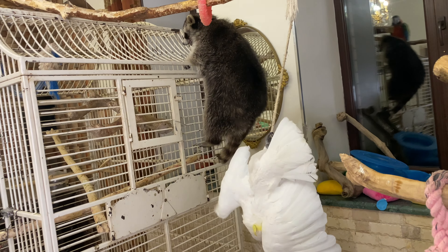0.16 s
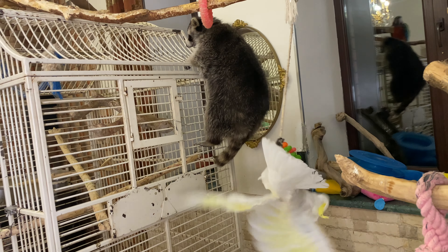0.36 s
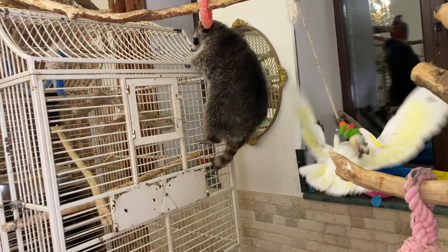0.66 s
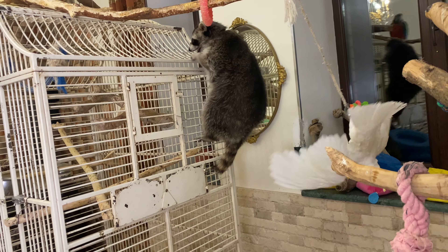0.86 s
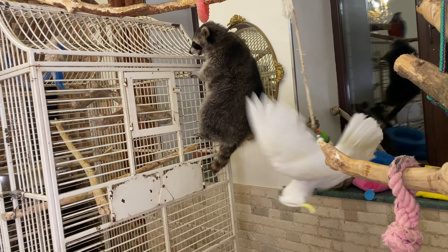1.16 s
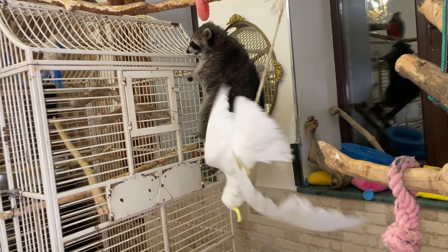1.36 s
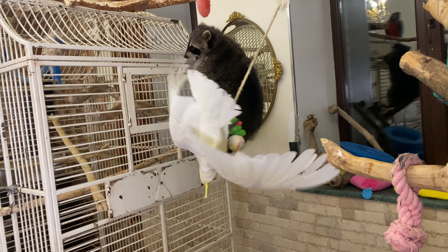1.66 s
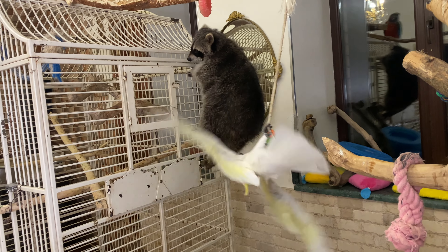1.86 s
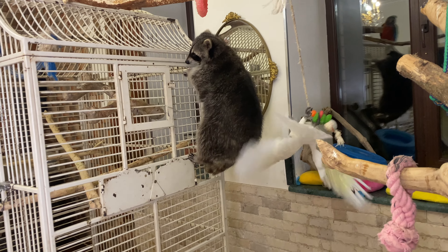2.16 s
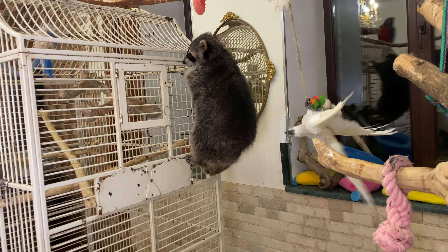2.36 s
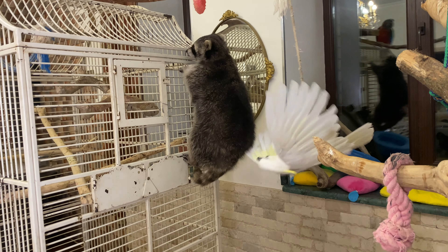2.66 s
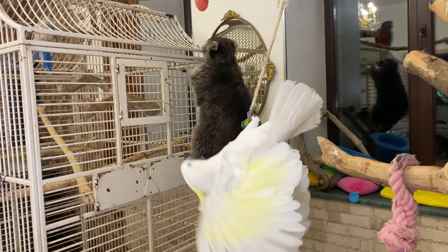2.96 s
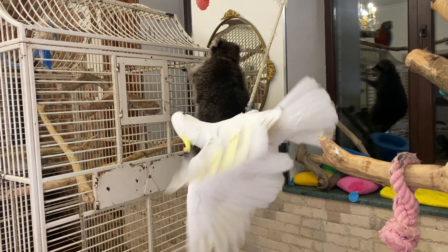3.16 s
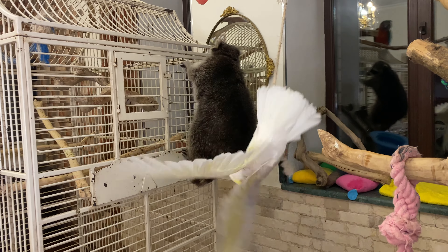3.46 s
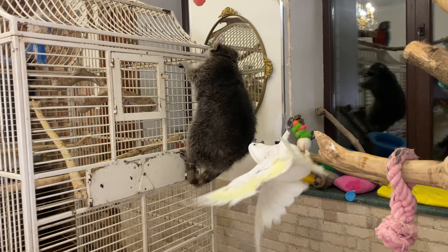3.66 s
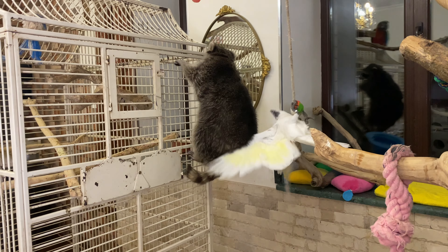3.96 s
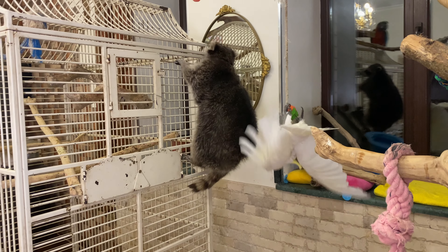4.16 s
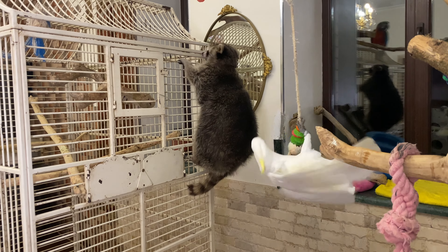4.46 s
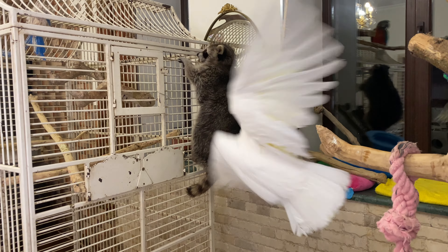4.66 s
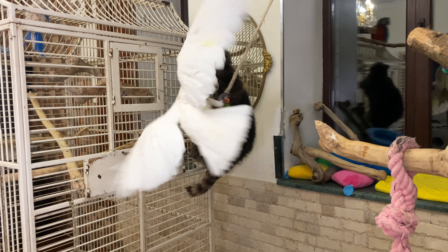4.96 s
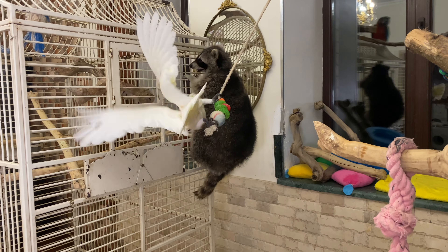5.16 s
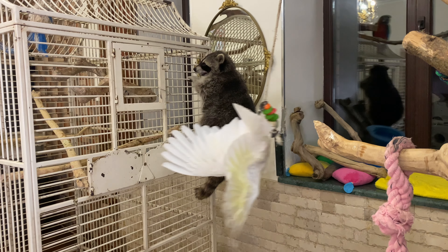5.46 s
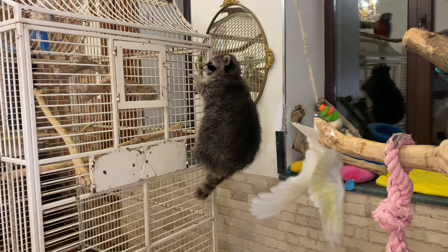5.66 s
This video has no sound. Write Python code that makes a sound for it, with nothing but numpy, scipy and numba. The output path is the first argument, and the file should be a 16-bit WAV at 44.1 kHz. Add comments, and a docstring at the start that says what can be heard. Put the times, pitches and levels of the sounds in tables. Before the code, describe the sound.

A cockatoo on a swinging toy yelps, then lets out a run of harsh rasping screeches in a ringing room, pauses, and screeches once more.

```python
"""A cockatoo on a hanging toy in a hard-walled room, heard in stereo over a faint mains hum.
A dull rumble dies away as a clear yelp comes with a whistle and a croak; then a run of rasping screeches, with
a brief low hum among them. Thin whistles, a croak and a pause with wingbeats lead to a last, wide-open screech.
Each screech scoops up in pitch, some clearer at first, some harsh at once, and grows toward a full rasp as the
syrinx turns more chaotic. The walls ring after each call, differently as the toy swings."""
import sys
import numpy as np
from scipy import signal
from scipy.fft import rfft, irfft, next_fast_len
from scipy.io import wavfile
from scipy.ndimage import uniform_filter1d
from numba import njit

SR = 44100
rng = np.random.default_rng(int(sys.argv[2]) if len(sys.argv) > 2 else 0)


def inscribe(sig):
    """Save sig as 16-bit PCM at rate SR to the path in sys.argv[1].

    A 1-D sig is mono; a 2-D sig holds one channel per row.
    Samples are clipped to [-1, 1] before scaling.
    """
    pcm = np.round(np.clip(np.atleast_2d(sig).T, -1, 1) * 32767)
    wavfile.write(sys.argv[1], SR, pcm.astype(np.int16))


N = 256220
T = np.arange(N) / SR  # s

# Call levels are those at the bird, ahead of the room; tilt_db lowers the bass and lifts the treble by that much.
# screeches: [start_s, length_s, attack_s, level_db, fade_over_call_db, first_pitch_hz, last_pitch_hz,
#  first_roughness_0_to_1, time_to_full_rasp_s, tilt_db, first_beak_hz, last_beak_hz, upper_resonance_hz]
SCREECH_ROWS = [(.754, .18, .024, -12.5, -10, 1140, 1159, .3, .17, 0.5, 2183, 2610, 3195),
                (0.922, 0.15, 0.038, -18.5, 2.5, 1129, 1129, .9, 0.13, 1, 2300, 2160, 3050),
                (1.183, .635, .05, -17, -7, 1062, 1151, 0.68, .3, 0, 2090, 2180, 2870),
                (1.954, .49, .125, -22, -1, 1129, 1080, 0.94, 0.058, -.5, 2230, 2120, 2870),
                (2.529, 0.56, .125, -21, 1, 1167, 1125, 0.45, 0.4385, -0.18, 2450, 2140, 2950),
                (3.279, .395, .055, -22, -4.5, 1120, 1206, 0.63, 0.54, -0.36, 2010, 2310, 2930),
                (5.297, 0.61, .052, -18, -3, 1320, 1382, .8, .5, 1.5, 2475, 2750, 3226)]
# short notes, whistled, clear or harsh: [start_s, length_s, attack_s, level_db, first_pitch_hz, last_pitch_hz,
#  roughness_0_to_1, tilt_db]
WHISTLE_ROWS = [(.415, 0.025, 0.0035, -20.5, 3780, 3625, 0.049, -8.5),
                (.725, 0.046, 0.0025, -26.5, 1638, 2055, 0.24, -13.5),
                (3.849, 0.16, 0.049, -43, 3850, 3925, 0.578, 0),
                (4.092, .128, 0.031, -38, 3825, 4007, 0.16, 0),
                (4.2, .092, 0.029, -34, 4094, 4176, .13, 11)]
YELP_ROWS = [(.421, 0.043, .02, -14.5, 889.8, 879, 0.05, .5),
             (0.457, .085, 0.027, -30.5, 881, 863.7, .05, 0)]
CROAK_ROWS = [(.431, 0.031, 0.0063, -26.5, 3300, 4530, 0.97, 6),
              (4.256, .058, 0.031, -36, 2700, 1400, 1, 2.5),
              (5.287, 0.048, 0.0036, -35, 1432, 1370, 0.72, -3)]
SCREECH_RELEASE_S, NOTE_RELEASE_S = .055, .014
# what a call loses where effort is nil: level, share of its pitch, and treble tilt
SLACK_DB, SLACK_PITCH_SHARE, SLACK_TILT_DB, NOTE_SLACK_TILT_DB = -10, .12, -2.5, -9.5
FULL_RASP = .98  # roughness, 0-1

# broad throat and beak colour of each kind of call: [frequency_hz, gain_db]
YELP_COLOUR = [(400, -19.5), (880, 1.5), (1770, 4), (2650, 8), (3550, -3.5), (4400, -1), (5300, -3),
               (6200, -7), (7100, -18), (8200, -27), (10500, -18), (16000, -33)]
SCREECH_COLOUR = [(250, -34), (450, -23.5), (700, -19.5), (880, -13), (1200, -15), (1650, -6), (2100, -3),
                  (2600, -0.5), (3000, -3.5), (3600, -5.5), (4200, -3), (5450, -10.5), (5750, -12.5),
                  (6100, -9.5), (7000, -15), (8500, -30.5), (11000, -22.5), (13000, -32.5)]
WIDE_OPEN_COLOUR = [(250, -27), (500, -12.5), (900, -6), (1380, -7), (1800, -4), (2600, -1), (3250, -3.5),
                    (4000, -10), (5050, -8), (5450, -17.5), (6400, -10.5), (8200, -29), (11000, -24.5),
                    (13000, -32.5)]
WHISTLE_COLOUR = [(900, -43), (2200, 3), (3000, 5.5), (4000, -0.5), (5000, -7), (6600, -1), (8000, -19),
                  (12000, -24.5)]
CROAK_COLOUR = [(400, -36), (1100, -18), (1700, -2.5), (2600, 3.5), (4000, -2.5), (6500, -4), (8200, -28),
                (11000, -19.5), (14000, -39)]
# windpipe, beak and upper resonance, one row each: [width_hz, level_over_broad_colour_db]
TRACT_RESONANCES = [(190, 2.5), (200, 4), (220, 7)]
WINDPIPE_RATIO = .573  # windpipe resonance as a share of the beak's
BEAK_WOBBLE, BEAK_WOBBLE_HZ = .023, 7.4  # spread of the resonances as a share, low-pass rate

# wingbeats: [centre_s, swish_db, puff_at_microphone_db]
WINGBEAT_ROWS = [(.57, -50.5, -59), (.8, -60, -73.5), (1.18, -47, -80), (1.98, -49.5, -80),
                 (2.42, -51.5, -80), (2.54, -47.5, -83), (4.59, -61, -64), (4.74, -61, -63.5),
                 (4.899, -57, -57), (5.08, -66, -62.5), (5.319, -45, -78)]
SWISH_S, PUFF_S = .023, .025  # spread of each swell
# feather rustles: [centre_s, level_db, spread_s]
RUSTLE_ROWS = [(.335, -51, 0.027), (.39, -47, 0.018), (4.627, -49, 0.0034), (5.173, -44, .0023),
               (5.185, -53.5, 0.0081), (5.22, -63, 0.072)]
# colours of the wing swish, the feather rustle and the puff of air: [frequency_hz, relative_level_db]
SWISH_COLOUR = [(100, -21.5), (250, -14.5), (480, 2.5), (800, -12), (1300, -8), (3000, -14), (12000, -23.5)]
RUSTLE_COLOUR = [(200, 2), (1000, -7), (4500, -3), (6500, -2.5), (8500, -13.5), (11000, -5), (16000, -6.5)]
PUFF_COLOUR = [(25, -18), (55, -7.5), (90, -16), (160, -21), (300, -19), (1000, -53.5)]

# gain of the wall echoes: [frequency_hz, gain_db]
WALL_COLOUR = [(100, -12.5), (600, -2), (820, 1.5), (1100, -1), (2500, .5), (6000, 1.5), (9000, 3),
               (14000, -4.5)]
# time for the echoes to fall 60 dB: [frequency_hz, decay_s]
WALL_DECAY = [(200, 1), (850, 0.71), (1300, 0.68), (3500, 0.69), (9000, 0.53)]
SWING_S = 1.7  # one swing of the toy, there and back
# phase difference between left and right in the direct sound, by frequency: [frequency_hz, phase_rad]
STEREO_PHASE = [(0, -1), (1030, 1.3), (1810, 0.5), (3360, 2), (4390, 0.9), (5680, 0.5), (8100, 9.5),
                (9300, -0.5), (9990, -4.5), (11900, 9.5), (12500, 3), (14400, -13), (15000, 16.5),
                (16500, 2)]

# mains hum, ahead of the background level below: [frequency_hz, level_db]
HUM_TONES = [(50, -72), (100, -71.5), (150, -69.5)]
# colours of the quiet room air and of the opening rumble: [frequency_hz, relative_level_db]
AIR_COLOUR = [(20, -28), (60, -0.5), (150, -6.5), (300, -10.5), (700, -11), (1500, -20.5), (6500, -20),
              (8000, -32), (11000, -15), (15000, -27.5)]
RUMBLE_COLOUR = [(59, -50), (100, -4.5), (155, -13.5), (183, -27), (259, -3), (410, -12.5), (484, -2.5),
                 (870, -14), (989, -4), (1560, -18.5), (2100, -17), (2260, -21.5), (8000, -33.5),
                 (10400, -46), (17600, -120)]
# gain on the hum and room air over time: [time_s, gain_db]
BACKGROUND_LEVEL = [(0, -5), (.8, 6), (.95, -13), (4.3, -12.5), (4.7, -5), (5.3, -7), (5.45, -11),
                    (5.8, -14)]
AIR_DB = -61.5  # ahead of the background level
TOP_HZ = 15500  # where the phone cuts the treble


def cockatoo():
    """All the calls of the bird, ahead of the room."""
    return yelps() + screeches() + whistles() + croaks()


def screeches():
    """Rasping calls from a chaotic syrinx; the one after the pause is made with the throat wide open."""
    first_run = sum(screech(row, SCREECH_COLOUR, wander=.065) for row in SCREECH_ROWS[:-1])
    last = screech(SCREECH_ROWS[-1], WIDE_OPEN_COLOUR, jitter=.07, wander=.08, turbulence=1.2)
    return first_run + last


def yelps():
    """A clear yelp and its softer tail: nearly regular membrane pulses."""
    return sum(note(row, YELP_COLOUR, jitter=.05, wander=.02, turbulence=1.5) for row in YELP_ROWS)


def whistles():
    """Thin whistles: few partials fit above their high pitch."""
    return sum(note(row, WHISTLE_COLOUR, jitter=.06, wander=.035, turbulence=1.4) for row in WHISTLE_ROWS)


def croaks():
    """Short harsh notes from a membrane in rough motion."""
    return sum(note(row, CROAK_COLOUR, turbulence=1.1) for row in CROAK_ROWS)


def screech(row, throat, **voice):
    """A screech scoops up in pitch as effort builds, clearer or harsh at first, grows rougher, then sags."""
    (start, length, attack, db, fade_db, first_hz, last_hz, first_rough, full_rasp_s, tilt_db,
     first_beak, last_beak, upper_hz) = row
    t, progress, effort = effort_curve(start, length, attack, SCREECH_RELEASE_S)
    slack = 1 - effort
    pitch = np.interp(progress, [0, 1], [first_hz, last_hz]) * (1 - SLACK_PITCH_SHARE * slack)
    rough = np.interp(t - start, [0, full_rasp_s], [first_rough, FULL_RASP])
    beak = np.interp(progress, [0, 1], [first_beak, last_beak])
    centres = (WINDPIPE_RATIO * beak, beak, upper_hz)
    level_db = db + fade_db * progress + SLACK_DB * slack
    return call(t, pitch, level_db, rough, tilt_db + SLACK_TILT_DB * slack, throat, centres, **voice)


def note(row, throat, **voice):
    """A short note: one straight glide that swells from nothing and brightens with effort."""
    start, length, attack, db, first_hz, last_hz, rough, tilt_db = row
    t, progress, effort = effort_curve(start, length, attack, NOTE_RELEASE_S)
    pitch = np.interp(progress, [0, 1], [first_hz, last_hz])
    level_db = db + 20 * np.log10(effort + 1e-6)
    return call(t, pitch, level_db, rough, tilt_db + NOTE_SLACK_TILT_DB * (1 - effort), throat, **voice)


def effort_curve(start, length, attack, release):
    """Times of one call, its progress 0-1 and the bird's effort 0-1: attack, hold, release."""
    t = T[(T >= start) & (T <= start + length)]
    effort = np.clip(np.minimum((t - start) / attack, (start + length - t) / release), 0, 1)
    return t, (t - start) / length, effort


def call(t, pitch, db, rough, tilt_db, throat, centres=None, jitter=.0518, wander=.055, turbulence=1.0):
    """One call: a membrane whose period and swing turn chaotic with roughness, heard through the throat."""
    size = len(t)
    rough = np.clip(rough, 0, 1)
    # the period trembles from cycle to cycle and lurches every few dozen cycles
    hz = pitch * np.exp(rough * (jitter * flutter(350, size) + wander * flutter(55, size)))
    phase = 2 * np.pi * np.cumsum(hz) / SR
    # the pulse shape keeps changing, so single partials flare for a few milliseconds
    pulses = np.zeros(size)
    for k in range(1, int(SR / 3 / pitch.mean()) + 1):
        drift = 2 * np.pi * rng.random() + rough * flutter(98.4, size)
        flare = undb(7.5 * rough * flutter(83, size))
        pulses += np.cos(k * phase + drift) * flare
    # air tears through the gap once a cycle
    air = unit(rng.standard_normal(size) * (1 + np.cos(phase)))
    source = unit(pulses) + turbulence * rough * air
    # the swing comes in ragged bursts, bounded by the walls of the syrinx
    bursts = 1 + rough * np.tanh(2 * flutter(220, size))
    shake = undb(rough * 2 * flutter(45, size))
    source = source * bursts * shake
    if centres is not None:
        source = tract(source, t, centres, rough)
    voice = colour(source, throat)
    # more effort lifts the treble against the low partials
    low = colour(voice, [(1000, 8.0), (2600, .5), (5000, -21.5)])
    voice = low * undb(-tilt_db) + (voice - low) * undb(tilt_db)
    # level out over 25 ms, then set the loudness, with 4 ms edges
    voice /= np.sqrt(uniform_filter1d(voice ** 2, size=1100) + 1e-12)
    edges = np.clip(np.minimum(t - t[0], t[-1] - t) / .004, 0, 1)
    out = np.zeros(N)
    out[(T >= t[0]) & (T <= t[-1])] = voice * undb(db) * edges
    return out


def tract(x, t, centres, rough, damping=.24):
    """Windpipe and beak ring on top of the sound, never quite still, and less when the rasp is harshest."""
    ring = np.zeros(len(t))
    for hz, (width, db) in zip(centres, TRACT_RESONANCES):
        moving_hz = hz * np.exp(BEAK_WOBBLE * flutter(BEAK_WOBBLE_HZ, len(t)))
        ring += undb(db) * resonate(x, moving_hz, float(width))
    return x + (1 - damping * rough ** 2) * ring


@njit
def resonate(x, hz, width):
    """State-variable band-pass with a moving centre, gain 1 there."""
    y, band, low = np.empty(len(x)), 0., 0.
    for i in range(len(x)):
        g, k = np.tan(np.pi * hz[i] / SR), width / hz[i]
        v = (band + g * (x[i] - low)) / (1 + g * (g + k))
        band, low, y[i] = 2 * v - band, low + 2 * g * v, k * v
    return y


def wing_swish():
    """Wings swish through the air: a swell of coloured noise at each beat."""
    return swells((s, db, SWISH_S) for s, db, _ in WINGBEAT_ROWS) * noise(SWISH_COLOUR)


def feather_rustle():
    """Feathers brush each other: short swells of coloured noise."""
    return swells(RUSTLE_ROWS) * noise(RUSTLE_COLOUR)


def wing_puffs():
    """Each wingbeat pushes a low puff of air straight onto the microphone."""
    return swells((s, db, PUFF_S) for s, _, db in WINGBEAT_ROWS) * noise(PUFF_COLOUR)


def room(x, direct_db=-6.5, wet_db=-1.5, right_db=1.06):
    """The direct sound differs in phase between left and right; the walls answer from all round."""
    n = next_fast_len(N)
    phase = np.interp(np.arange(n // 2 + 1) * SR / n, *np.transpose(STEREO_PHASE))
    right = irfft(rfft(x, n) * np.exp(-1j * phase), n)[:N]
    direct = np.array([x, right])
    wet = np.array([swinging_echoes(x) for _ in range(2)])
    return (undb(direct_db) * direct + undb(wet_db) * wet) * undb([[0], [right_db]])


def swinging_echoes(x, count=5):
    """The bird swings through several spots, and the walls answer differently from each."""
    place = (count - 1) * (1 + np.cos(2 * np.pi * T / SWING_S)) / 2
    echoes = np.zeros(N)
    for spot in range(count):
        nearness = np.cos(np.pi / 2 * np.clip(place - spot, -1, 1))
        echoes += signal.fftconvolve(x * nearness, wall_echoes())[:N]
    return echoes


def wall_echoes(early=.45, early_s=.02):
    """Response of the room in one channel: a few sharp reflections, then a diffuse tail that dulls as it dies."""
    t = T[:SR]
    f, frame_s, tail = signal.stft(rng.standard_normal(SR), SR)
    decay = undb(-60 * frame_s / at(WALL_DECAY, f)[:, None])
    tail = signal.istft(tail * decay)[1][:SR]
    sparse = rng.random(SR) < 500 / SR  # about 500 reflections a second
    reflections = rng.standard_normal(SR) * sparse * np.exp(-t / early_s)
    response = (unit(tail) + early * unit(reflections)) * np.clip(t / .0026, 0, 1)
    return colour(unit(response) / np.sqrt(SR), WALL_COLOUR)


def low_tone(start=2.922, hz=219, db=-46.0, step_db=-9, ring_db=-23):
    """A brief low hum, a sine that drops to a weaker level, stops and rings on faintly; stronger at right."""
    t = T - start
    steps_s = [0, .014, .06, .073, .13, .14, .4]
    shape = np.interp(t, steps_s, [0, 1, 1, undb(step_db), undb(step_db), undb(ring_db), 0])
    tone = undb(db) * shape * np.sqrt(2) * np.sin(2 * np.pi * hz * t)
    return tone * undb([[-3], [2]])


def background():
    """Rumble, with hum and air under a level that drops quickly as screeches begin and partly recovers in the pause."""
    level = undb(np.interp(T, *np.transpose(BACKGROUND_LEVEL)))
    return (mains_hum() + room_air()) * level + rumble()


def mains_hum():
    """Steady sines at the mains frequency and its harmonics."""
    return sum(undb(db) * np.sqrt(2) * np.sin(2 * np.pi * (hz * T + rng.random())) for hz, db in HUM_TONES)


def room_air():
    """Quiet coloured noise, partly common to left and right and partly each side's own."""
    own = np.array([noise(AIR_COLOUR), noise(AIR_COLOUR)])
    return undb(AIR_DB) * (.9 * noise(AIR_COLOUR) + .5 * own)


def rumble():
    """Dull noise, separate at left and right, that dies away from the start by 60 dB in 0.68 s."""
    return undb(-43.5 - 60 * T / .68) * np.array([noise(RUMBLE_COLOUR), noise(RUMBLE_COLOUR)])


def undb(db):
    """Decibels to gain."""
    return 10 ** (np.asarray(db) / 20)


def unit(x):
    """Scale to rms 1."""
    return x / np.sqrt(np.mean(x ** 2))


def at(points, hz):
    """Read (Hz, value) points on a log-frequency axis."""
    f, value = np.transpose(points)
    return np.interp(np.log(hz + 1), np.log(f), value)


def colour(x, points):
    """Filter by a (Hz, dB) spectrum."""
    n = next_fast_len(x.shape[-1] + 2048)
    gain = undb(at(points, np.arange(n // 2 + 1) * SR / n))
    return irfft(rfft(x, n) * gain, n)[..., :x.shape[-1]]


def flutter(hz, size):
    """Random motion of rms 1, low-passed at hz."""
    lowpass = signal.butter(2, hz, fs=SR, output="sos")
    return unit(signal.sosfilt(lowpass, rng.standard_normal(size)))


def noise(points):
    """Coloured noise of rms 1."""
    return unit(colour(rng.standard_normal(N), points))


def swells(rows):
    """A smooth rise and fall for each (centre s, dB, spread s) row."""
    return sum(undb(db) * np.exp(-.5 * ((T - s) / spread) ** 2) for s, db, spread in rows)


def scene():
    """The bird in its room; the push of air from its wings arrives directly."""
    bird = cockatoo() + wing_swish() + feather_rustle()
    return room(bird) + wing_puffs() + low_tone() + background()


def record(dry):
    """The phone rounds the loudest peaks, thins the deepest bass and cuts the top."""
    sound = colour(np.tanh(dry), [(15, -28.5), (45, 2.5), (11800, 1), (13200, -5), (15000, 0)])
    return signal.sosfilt(signal.ellip(8, .2, 70, TOP_HZ, fs=SR, output="sos"), sound)


dry = scene()
out = record(dry)
inscribe(out)
```